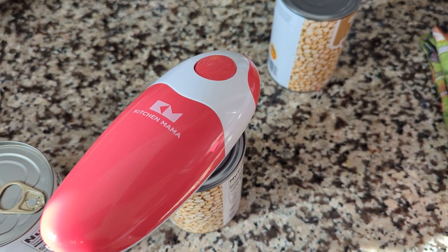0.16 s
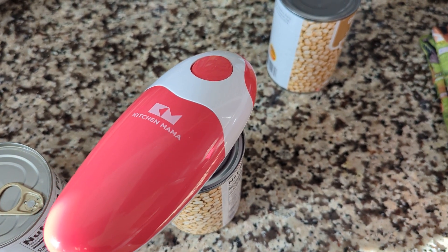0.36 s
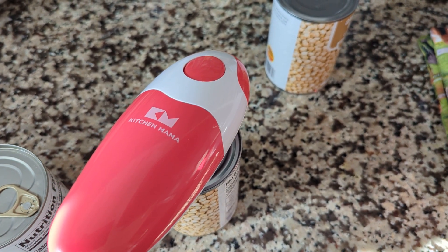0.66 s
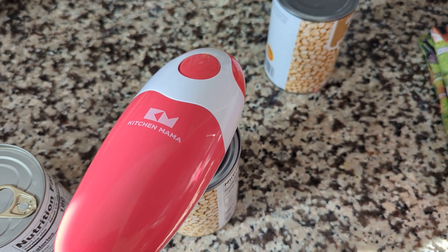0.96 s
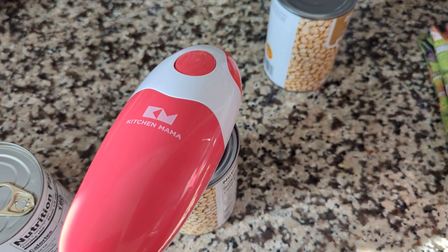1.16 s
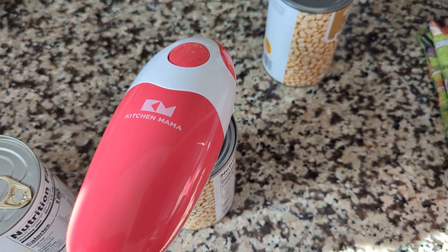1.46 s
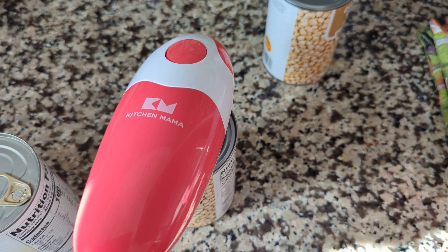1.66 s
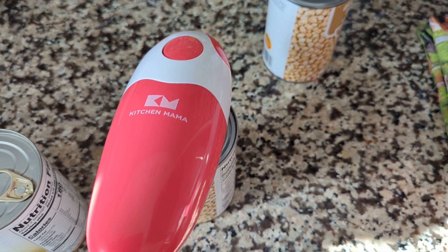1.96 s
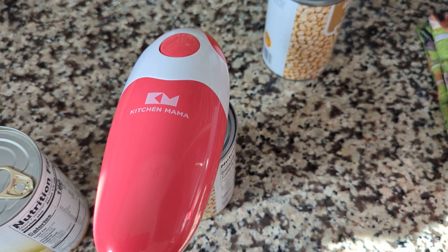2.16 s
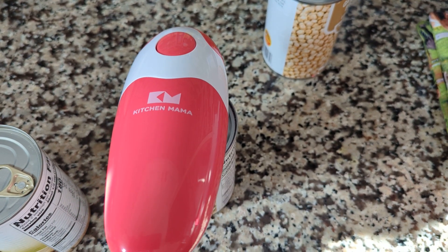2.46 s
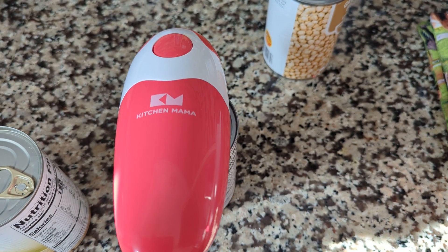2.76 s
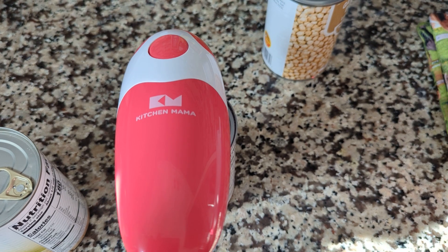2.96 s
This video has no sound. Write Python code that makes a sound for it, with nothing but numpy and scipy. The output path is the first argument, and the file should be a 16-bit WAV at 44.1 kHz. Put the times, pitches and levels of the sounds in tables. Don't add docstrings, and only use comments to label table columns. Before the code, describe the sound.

Close up in a quiet kitchen, a small plastic-bodied motor whines and buzzes without pause, gears clicking about fourteen times a second, with raspy friction noise and slight swells in loudness.

```python
import sys
import numpy as np
from scipy import signal
from scipy.fft import rfft, irfft
from scipy.io import wavfile

SR = 44100
rng = np.random.default_rng(int(sys.argv[2]) if len(sys.argv) > 2 else 0)


def volts_from_db(level):
    exponent = np.asarray(level, float) / 20
    return 10 ** exponent


def inscribe(sig):
    pcm = np.round(np.clip(np.atleast_2d(sig).T, -1, 1) * 32767)
    wavfile.write(sys.argv[1], SR, pcm.astype(np.int16))


N = 136710

# start_s, shaft_turns_per_s, whine_db
DRIVE = [(0, 177.1, -27), (.07, 177.3, -38.5), (.2, 177.3, -35), (.27, 176.9, -29.5), (.6, 175.8, -27),
         (.67, 175.0, -35.5), (.74, 174.1, -30.5), (.92, 174.6, -27.8), (1.2, 173.85, -28.3),
         (1.44, 173.3, -27.5), (1.52, 172.6, -32), (1.58, 173.9, -26.8), (1.96, 174.4, -24.5),
         (2.1, 173.3, -27.5), (2.3, 175.46, -25.5), (2.42, 175.8, -26), (2.65, 174.55, -29),
         (3.1, 174.3, -31)]
# pitch_hz, correlation (-1 to 1)
LIKENESS = [(60, 0.98), (130, 0.92), (290, 0.82), (640, 1), (1410, -0.052), (3100, 1), (6820, -0.24),
            (15000, -0.2)]

KNOCK_TURN = 0.102
TICK_TURNS, FIRST_TICK_TURN = 12.393, 4.65
SLOW_TURNS = 28.7


def rms_one(x):
    return x / np.sqrt(np.mean(x ** 2) + 1e-20)


def at_hz(points, hz):
    points = np.array(points)
    return np.interp(np.log(hz), np.log(points[:, 0]), points[:, 1])


def drift(rate_hz):
    hop = 40
    r = np.exp(-2 * np.pi * rate_hz * hop / SR)
    white = rng.standard_normal(N // hop + 2002)
    slow = signal.lfilter([1], [1, -2 * r, r * r], white)[2000:]
    slow = rms_one(slow - slow.mean())
    return np.interp(np.arange(N) / hop, np.arange(len(slow)), slow)


def coloured(spectrum, white):
    # pitch_hz, left_right_db
    lean = [(60, 0.5), (130, 0.0), (290, 0.0), (640, 1.5), (1410, 5.0), (3100, -0.5), (6820, 5.5),
            (15000, 1.5)]
    hz = np.maximum(np.fft.rfftfreq(N, 1 / SR), 1)
    mid, side = rfft(white)
    alike = np.clip(at_hz(LIKENESS, hz), -1, 1)
    sides = np.array([[1], [-1]])
    gain = volts_from_db(at_hz(spectrum, hz) + sides * at_hz(lean, hz) / 2)
    gain = gain * (hz > spectrum[0][0] / 2)
    both = np.sqrt(1 + alike) * mid + np.sqrt(1 - alike) * side * sides
    return rms_one(irfft(gain * both, N))


def resonant(modes, white):
    hz = np.fft.rfftfreq(N, 1 / SR)
    sides = np.array([[.5], [-.5]])
    gain = 0
    for k, (centre_hz, width_hz, db, lean_db, lead_rad) in enumerate(modes):
        path = volts_from_db(db + sides * lean_db) * np.exp(1j * sides * lead_rad)
        resonance = 1 / (1 + 2j * (hz - centre_hz) / width_hz) ** 2
        gain = gain + (-1) ** k * path * resonance
    return rms_one(irfft(gain * rfft(white), N))


def wheel_cosine(turns, peak_turn, period):
    return np.cos(2 * np.pi * (turns - peak_turn) / period)


def shaft():
    s, speed, whine_db = np.transpose(DRIVE)
    t = np.arange(N) / SR
    even = np.cumsum(np.interp(t, s, speed)) / SR
    sway = .48 * wheel_cosine(even, 21.5, SLOW_TURNS)
    sway = sway - .85 * wheel_cosine(even, FIRST_TICK_TURN + 1.8, TICK_TURNS)
    turns = even + np.cumsum(sway) / SR
    turns = turns + .002 * drift(35.0)
    mean_whine_db = -28.5
    return turns, np.interp(t, s, whine_db - mean_whine_db)


def tones(table, turns, start_turn, swell_db):
    # pitch_hz, change_db_per_s
    turning = [(500, 1), (700, 1), (1000, 2.2), (1400, 0), (1900, 1.5), (2800, 1.5), (4500, -.8),
               (4950, -2)]
    follows = 0.14
    out = np.zeros((2, N))
    t = np.arange(N) / SR - N / SR / 2
    for order, db, lean_db, lead_rad in table:
        db = db + 2.5 + t * at_hz(turning, order * 162.0)
        flutter = drift(6.0)
        if order == 10:
            db = db + swell_db + 0.5 * flutter
            db = db + 1.05 * wheel_cosine(turns, FIRST_TICK_TURN - 3.5, TICK_TURNS)
            db = db + .6 * wheel_cosine(turns, 20, SLOW_TURNS)
        elif order == 6.667:
            db = db + follows * swell_db + flutter
            db = db + 1.6 * wheel_cosine(turns, 4.8, TICK_TURNS)
            db = db + 1.4 * wheel_cosine(turns, 3.1, SLOW_TURNS)
        else:
            db = db + follows * swell_db + 1.4 * flutter
            db = db + 1.0 * wheel_cosine(turns, TICK_TURNS * rng.random(), TICK_TURNS)
        ratio = np.round(order * 9) / 9
        phase = 2 * np.pi * ratio * (turns - start_turn) + 1.105 * rng.standard_normal()
        share = rms_one(volts_from_db(np.array([lean_db, -lean_db]) / 2))
        out += share[:, None] * volts_from_db(db) * np.cos(phase + [[lead_rad], [0]])
    return out


def gear_whine(turns, swell_db):
    # multiple_of_shaft, level_db, left_right_db, left_lead_rad
    shaft_tones = [(1, -59.7, 0.1, -0.1), (3, -56.5, 6.3, 1.7), (4, -53, -0.7, 0.1), (6, -48.9, -2.5, 0.1),
                   (7, -54.6, 6.7, 0.2), (8, -38.9, 6.1, -0.5), (9, -45.5, 4.8, -0.9),
                   (10, -27.2, 5.1, -0.5), (11, -39.7, 9.6, -0.6), (12, -44.9, 2.6, 1.9),
                   (13, -47.6, 5.9, 2.4), (14, -37.8, -0.8, -2.6), (15, -45.9, 2.4, -1.3),
                   (16, -34.5, -2.0, 2.1), (17, -47.0, -0.5, -1.6), (18, -46.4, -5.2, -0.3),
                   (19, -44.2, -4.5, -1.5), (20, -41.8, -1.1, -2.2), (21, -47.5, 0.5, 2.0),
                   (23, -51.4, 4.2, -0.6), (24, -44.4, 7.5, -1.4), (25, -51.2, 1.2, -2.8),
                   (26, -46.3, 2.5, 1.5), (27, -45.0, 6.1, 0.2), (28, -50, 6.5, 0.3), (29, -42.1, 9.0, 2.6),
                   (30, -34, 8.6, -2.1), (31, -46.0, 5.7, -1.6), (32, -55, 7.2, -0.1),
                   (36, -56.8, 3.5, 1.2)]
    # multiple_of_shaft, level_db, left_right_db, left_lead_rad
    wheel_tones = [(4.222, -62.2, 5.0, -0.4), (4.444, -58.8, 4.6, -1.6), (6.667, -46.2, 0.5, -0.2),
                   (8.222, -49.6, 3.1, -0.0), (10.222, -47, 4.1, -0.3), (11.222, -51, 5.8, -0.5),
                   (12.222, -50.2, -2.8, -0.5), (14.222, -49.0, 1.8, -1.5), (15.111, -46.2, 1.7, 2.0),
                   (15.556, -41.7, -5.8, 2.0), (15.778, -41.0, -3.3, 2.5), (16.222, -45.5, -4.2, 1.3),
                   (16.667, -44.2, -1.9, -0.8), (16.889, -44.4, -0.4, -1.6), (18.222, -50.1, -1.1, -0.5),
                   (24.222, -47, 6.1, -2.3), (28.222, -46.4, 7.3, 0.6), (29.556, -45.2, 9.2, -2.8),
                   (30.667, -52, 5.1, -2.0), (31.556, -54, 6, -1), (17.222, -48, -1, -1),
                   (18.444, -51, -1, -.5), (19.556, -51, -2, -1), (19.778, -50, -1, -1.5),
                   (25.111, -53, 2, 0), (25.333, -54, 2, 0)]
    whine = tones(shaft_tones, turns, 0.2945, swell_db)
    return whine + tones(wheel_tones, turns, KNOCK_TURN, swell_db)


def brush_buzz(turns):
    # pitch_hz, level_db
    envelope = [(5700, -60), (7000, -58), (9500, -64), (12000, -57), (13500, -52), (15000, -51),
                (15400, -66)]
    size = 4096
    order = np.arange(33, 89)
    shape = (2, len(order))
    lines = np.zeros((2, size // 2 + 1), complex)
    db = at_hz(envelope, order * np.mean(np.array(DRIVE)[:, 1])) + 4.0 * rng.standard_normal(shape)
    lines[:, order] = volts_from_db(db) * np.exp(2j * np.pi * rng.random(shape)) * size / 2
    where = (turns + .0015 * drift(43.0)) % 1 * size
    return np.array([np.interp(where, np.arange(size), row) for row in irfft(lines, size)])


def hiss(turns):
    # pitch_hz, density_db_per_hz
    broad_spectrum = [(300, -30.5), (900, -18), (2000, -3), (3800, -10.5), (5500, -5.5), (6000, -11),
                      (10000, -13.5), (16000, -36)]
    # pitch_hz, density_db_per_hz
    top_spectrum = [(9000, -15), (13000, 3.5), (14000, -1), (15000, 8), (15300, -1), (16000, -21)]
    # pitch_hz, width_hz, level_db, left_right_db, left_lead_rad
    humps = [(714, 180, -19.5, -5.5, 2.5), (1145.4, 31, -18, -32, -0.3), (1402, 230, -6.5, 9.5, 1.5),
             (1776, 260, -4.5, 14.5, -0.7), (2418, 60, -8.5, 17.5, 3.5), (2810, 205, -0.5, -10, 2),
             (3560, 700, -6, 1, -1.4), (4173, 165, -3, -7.5, -2), (4330, 490, -1, 12.5, 2.5),
             (4660, 55, -3.5, -6, 0.4), (4857, 320, -7.5, 2, -1), (5255, 370, -6.5, 8.5, -1)]
    push_db = 1.5 * np.cos(np.pi * (turns - FIRST_TICK_TURN - .5) / TICK_TURNS) ** 4 + drift(25.0)
    gate = volts_from_db(2.5 * np.cos(2 * np.pi * turns) + push_db)
    broad = volts_from_db(-34.5) * coloured(broad_spectrum, rng.standard_normal((2, N)) * gate)
    humped = volts_from_db(-30.5) * resonant(humps, rng.standard_normal(N) * gate)
    top = volts_from_db(-39.5) * coloured(top_spectrum, rng.standard_normal((2, N)) * gate)
    return broad + humped + top


def kitchen():
    # pitch_hz, density_db_per_hz
    room = [(35, -22), (55, 2), (75, -10), (100, -7), (140, -12.5), (220, -21.5), (290, -38), (420, -14)]
    # pitch_hz, rms_db
    hum_lines = [(59.2, -64.5), (118.4, -61), (172.3, -61), (215.3, -68), (360.7, -63.5)]
    t = np.arange(N) / SR
    hum = 0
    for hz, db in hum_lines:
        if abs(hz - 173) > 5:
            level = volts_from_db(db + 1.5 + 2.5 * drift(2.1))
            hum = hum + level * np.sin(2 * np.pi * (hz * t + rng.random()))
    return hum + volts_from_db(-54) * coloured(room + [(1200, -31)], rng.standard_normal((2, N)))


def knocks(turns):
    # pitch_hz, level_db, t60_s
    modes = [(2620, -16, 0.018), (2860, -13.5, .02), (3100, -12, 0.017), (1132, -17, 0.13)]
    wheel_turns = 4.5
    at = np.flatnonzero(np.diff(np.floor((turns - KNOCK_TURN) / wheel_turns)) > 0)
    out = np.zeros((2, N))
    for hz, db, t60 in modes:
        clicks = np.zeros(N)
        clicks[at] = volts_from_db(-27 + db + 3 * rng.standard_normal(len(at)))
        r, w = volts_from_db(-60 / (t60 * SR)), 2 * np.pi * hz / SR
        ring = signal.lfilter([0, np.sin(w)], [1, -2 * r * np.cos(w), r * r], clicks + 1e-18)
        right = np.clip(2 * at_hz(LIKENESS, hz), -1, 1) if hz < 2000 else -.8
        out += ring * [[1], [right]]
    return out


def ticks():
    # start_s, bright_db, thud_db
    times = [(0.029, -29.2, -25.5), (0.099, -32.7, -23.0), (0.167, -31.5, -31.5), (0.236, -31.3, -23.7),
             (0.308, -29.2, -26.3), (0.378, -30.2, -25.5), (0.448, -32.1, -27.8), (0.515, -29.3, -28.7),
             (0.585, -28.3, -22.0), (0.658, -29.0, -25.0), (0.728, -30.4, -27.6), (0.799, -29.0, -29.1),
             (0.871, -28.8, -27.6), (0.943, -27.4, -26.8), (1.014, -30.1, -30.8), (1.085, -30.8, -30.4),
             (1.157, -29.9, -29.2), (1.227, -28.3, -27.9), (1.299, -29.0, -29.2), (1.37, -29.3, -28.6),
             (1.441, -27.7, -27.7), (1.514, -28.8, -26.0), (1.585, -29.2, -28.0), (1.658, -30.6, -29.0),
             (1.728, -28.8, -27.4), (1.8, -28.7, -23.8), (1.87, -29.1, -25.9), (1.941, -28.8, -24.9),
             (2.012, -29.3, -25.0), (2.083, -27.7, -26.6), (2.156, -27.7, -27.3), (2.226, -29.8, -28.2),
             (2.298, -28.8, -25.1), (2.368, -27.4, -25.7), (2.438, -29.4, -24.7), (2.509, -27.8, -28.4),
             (2.58, -27.5, -24.8), (2.651, -29.8, -22.1), (2.722, -30.0, -28.6), (2.792, -29.1, -27.2),
             (2.863, -27.6, -23.7), (2.934, -29.4, -26.7), (3.006, -30.4, -27.3), (3.077, -27.9, -25.8)]
    # pitch_hz, width_hz, level_db, left_right_db, left_lead_rad
    tick_ring = [(4900, 900, -5, 3, .3), (6130, 500, 0, 0, 1.5), (6860, 600, 2, 0, -1.5),
                 (8500, 1500, -1, 0, 1.8), (10500, 2500, -5, 0, -2), (13000, 3500, -7, 0, 1.5)]
    # pitch_hz, width_hz, level_db, left_right_db, left_lead_rad
    thud_ring = [(1470, 260, 6, 2, 0), (2230, 1500, -6, 2, 2.3), (2860, 1200, 10.5, -2, 0.94)]
    rise_s, fall_s, tail_s = .0008, .0028, .009
    s, bright_db, thud_db = np.transpose(times)
    t = np.arange(-1500, 1501) / SR
    after = np.maximum(t, 0)
    rise = np.exp(np.minimum(t, 0) / rise_s)
    fall = np.exp(-after / fall_s)
    tail = volts_from_db(-11) * (np.exp(-after / tail_s) - fall)
    shape = np.where(t < 0, rise, fall + tail)

    def burst(ring, level_db, db, lag_s):
        clicks = np.zeros(N)
        clicks[((s + lag_s - rise_s) * SR).astype(int)] = volts_from_db(db)
        grit = rng.choice([-1, 1], N) * volts_from_db(1.0 * rng.exponential(1, N))
        return volts_from_db(level_db) * resonant(ring, signal.fftconvolve(clicks, shape, "same") * grit)

    return burst(tick_ring, -40.5, bright_db, 0) + burst(thud_ring, -39, thud_db, .001)


def gapped(x):
    # pitch_hz, half_width_hz, level_db
    gaps = [(1630, 50, -4), (3570, 45, -7), (3800, 70, -9), (4090, 50, -8), (4330, 30, -4), (4790, 40, -6),
            (5010, 50, -6), (5800, 200, -3)]
    hz = np.fft.rfftfreq(N, 1 / SR)
    dip_db = sum(db * np.exp(-((hz - centre_hz) / width_hz) ** 2) for centre_hz, width_hz, db in gaps)
    return irfft(rfft(x) * volts_from_db(dip_db), N)


def scene():
    turns, swell_db = shaft()
    motor = gear_whine(turns, swell_db) + brush_buzz(turns)
    through_shell = gapped(hiss(turns) + ticks())
    return motor + through_shell + kitchen() + knocks(turns)


def band_limit(x):
    return signal.sosfilt(signal.butter(12, 15820, fs=SR, output="sos"), x)


def record(dry):
    return band_limit(dry)


dry = scene()
out = record(dry)
inscribe(out)
```